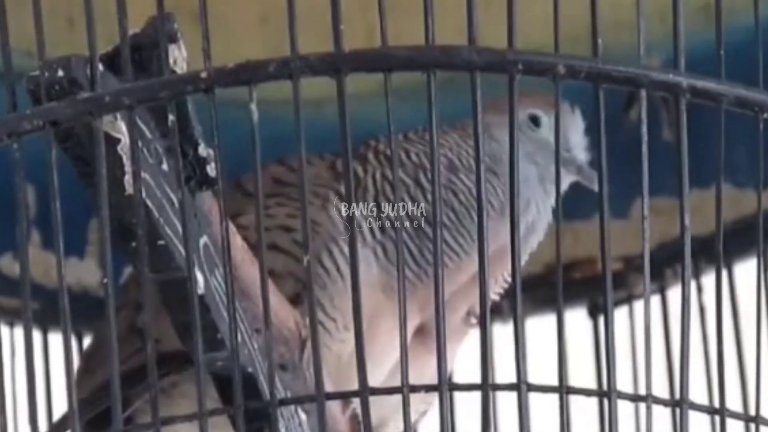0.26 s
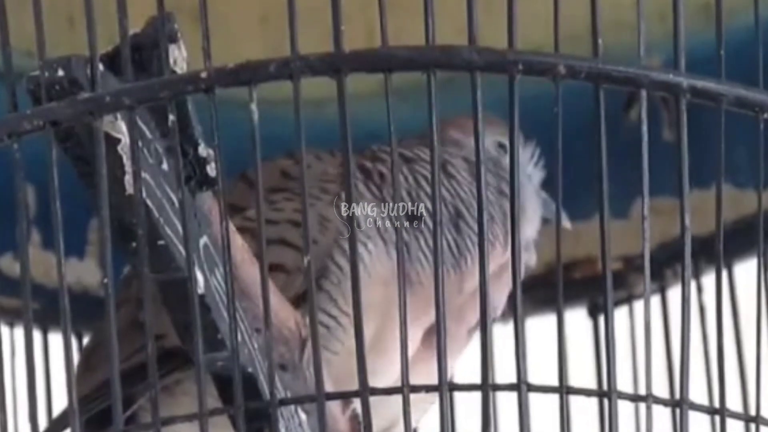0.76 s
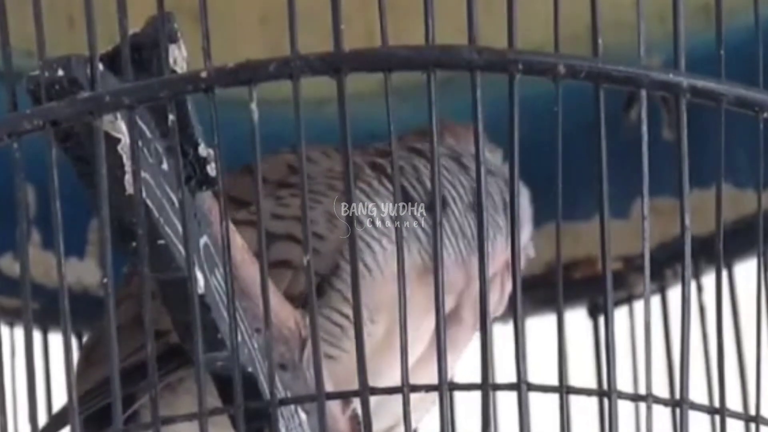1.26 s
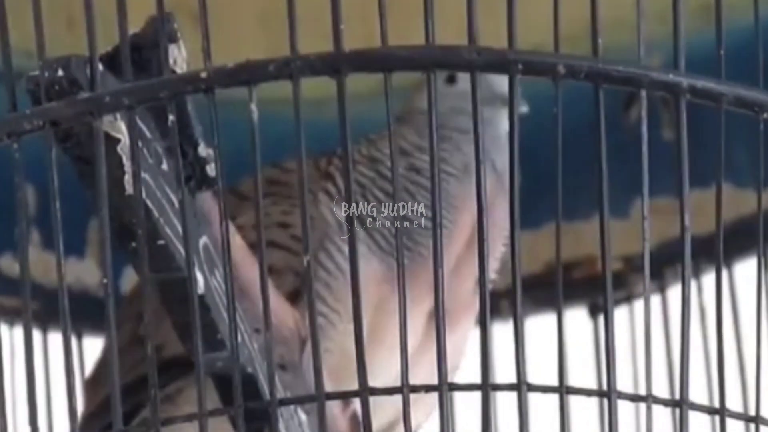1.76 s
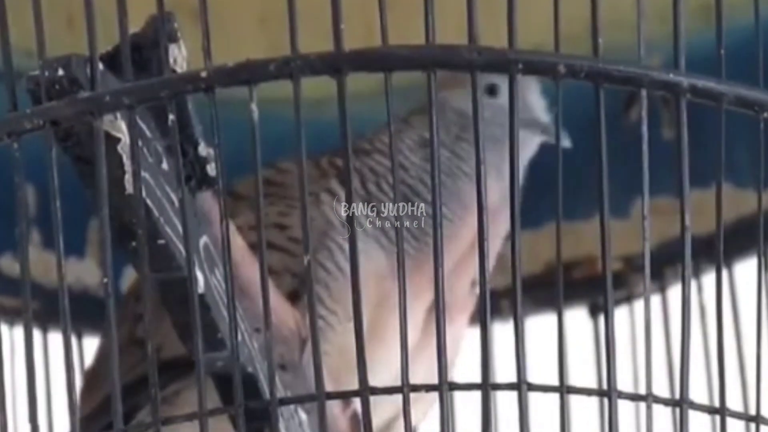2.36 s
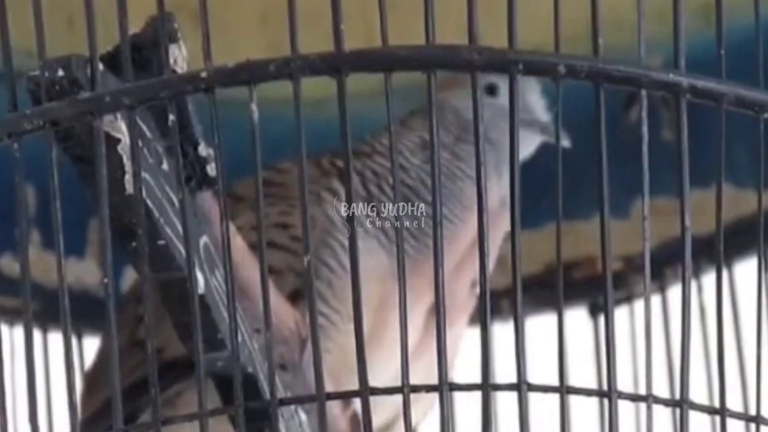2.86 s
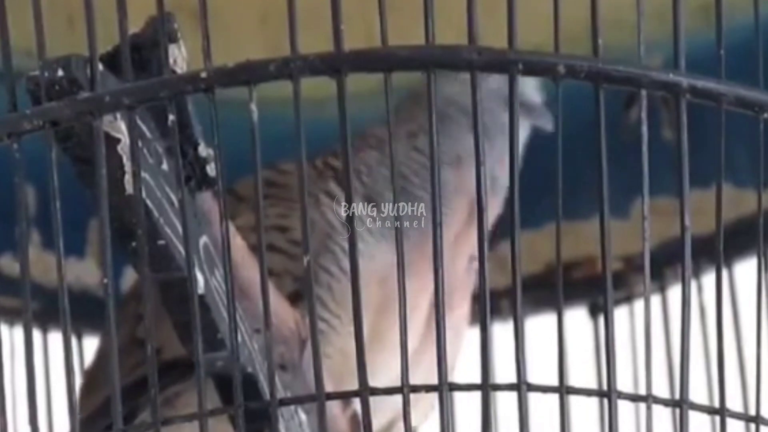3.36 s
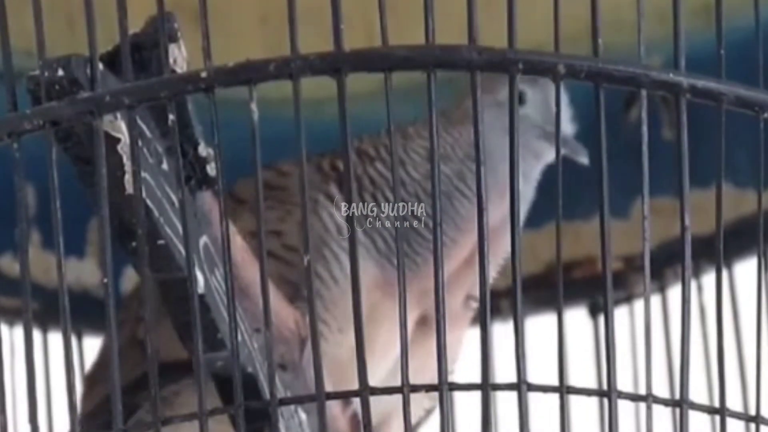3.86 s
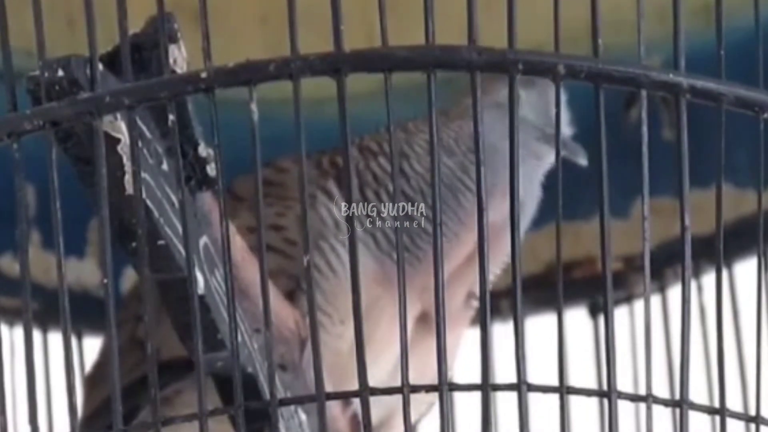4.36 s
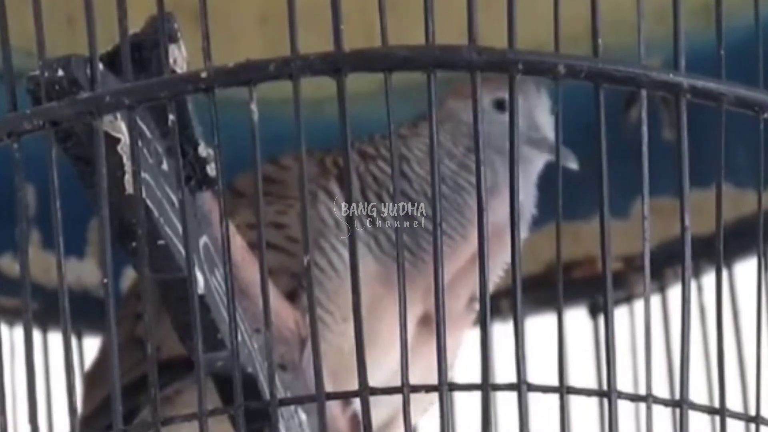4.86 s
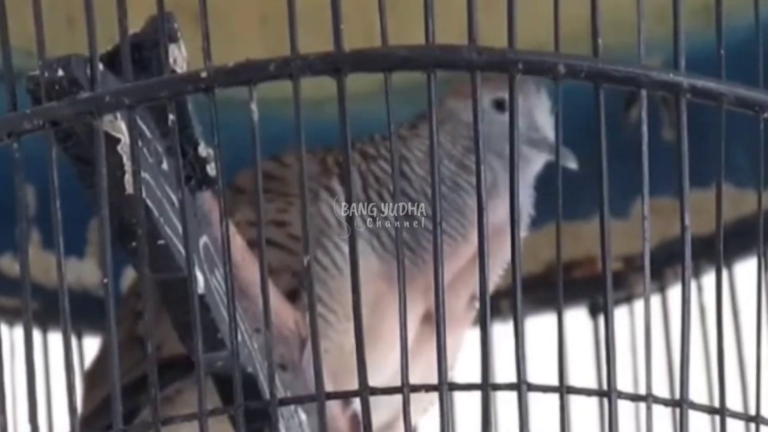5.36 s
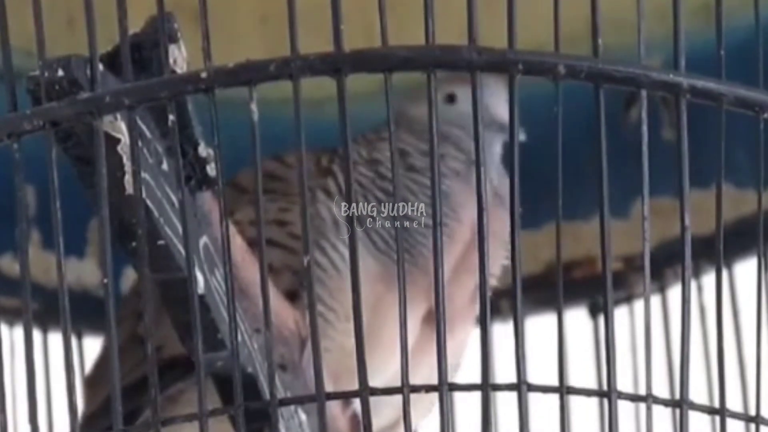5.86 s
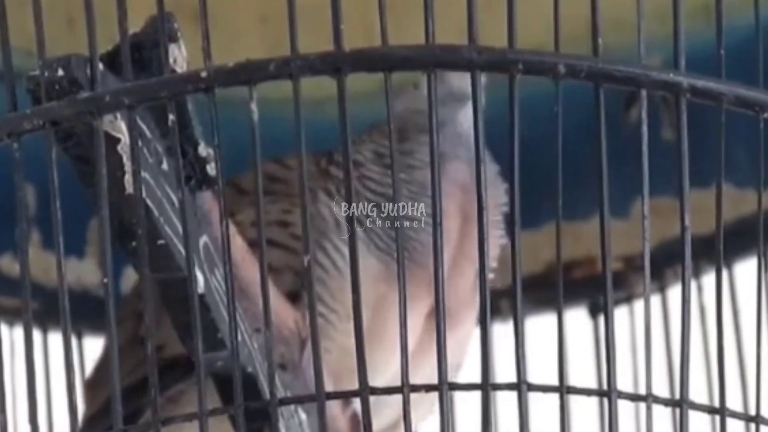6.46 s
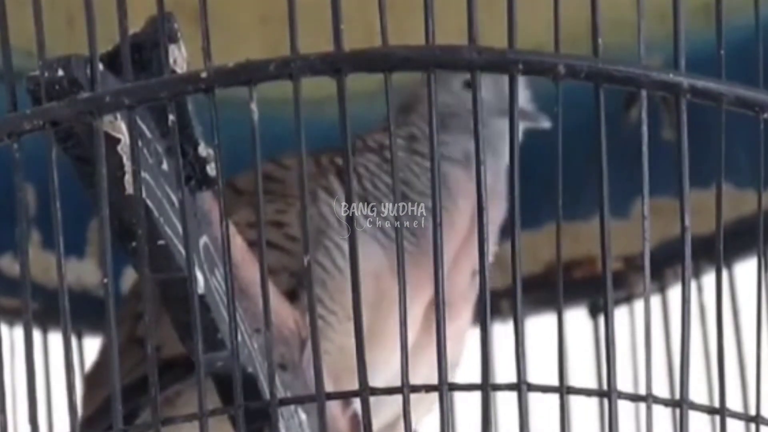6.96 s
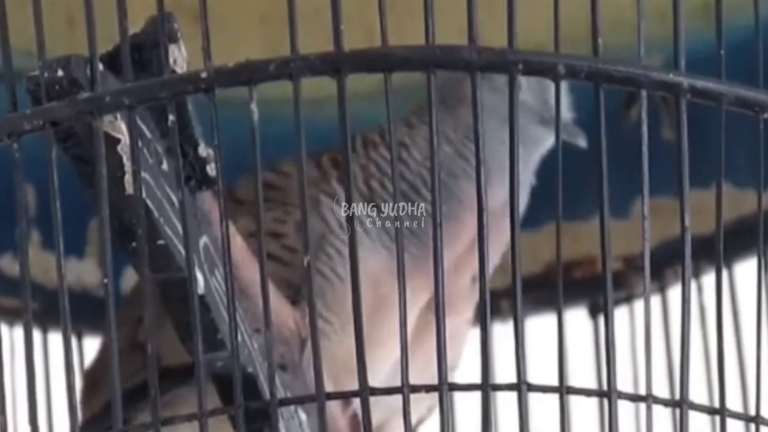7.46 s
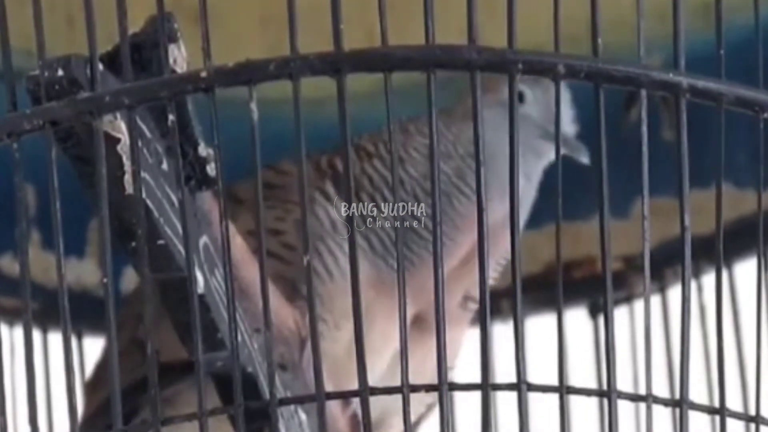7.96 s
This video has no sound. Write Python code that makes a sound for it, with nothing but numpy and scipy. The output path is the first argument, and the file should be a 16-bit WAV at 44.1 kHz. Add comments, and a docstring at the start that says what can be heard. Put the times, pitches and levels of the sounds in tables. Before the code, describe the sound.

Caged doves sing quick trills and clear coos in an echoing yard, over a faint town hum.

```python
"""A hard-walled yard with cages, on two microphones over a faint town hum.
Close by, zebra doves trill and coo in overlapping phrases; their membranes flap, then lock on a tone.
Further off a bigger dove purrs and a small bird peeps; a reedy dove calls from another cage.
Feathers rustle and a foot taps a perch. The near coos are almost pure tones:
the overloaded recorder squares them off and adds their odd overtones."""
import sys
import numpy as np
from scipy import signal
from scipy.fft import rfft, irfft, next_fast_len
from scipy.io import wavfile

SR = 44100
rng = np.random.default_rng(int(sys.argv[2]) if len(sys.argv) > 2 else 0)


def bounce(signal):
    """Save signal as a 16-bit WAV file at the path given by the first command-line argument."""
    frames = np.transpose(np.atleast_2d(signal))
    limited = np.clip(frames, -1, 1)
    pcm = np.round(limited * 32767).astype(np.int16)
    wavfile.write(sys.argv[1], SR, pcm)


N = 362061

# distant town: frequency_hz, level_db
TOWN_SPECTRUM = [(15, -76), (25, -37), (106, -12.5), (172, -9), (250, -5), (293, -7), (326, -9.5),
                 (515, -11), (1090, -11), (3090, -21.5), (4380, -24), (6040, -28), (11800, -37),
                 (15000, -65)]
# near arched coos, a firm note, two or three short, then long ones: start_s, length_s, pitch_hz, level_db
HIGH_COOS = [ (0.000, 0.052, 1021, -19), (.768, 0.14, 1200, -10.5), (.905, 0.063, 1155, -16),
             (.968, 0.043, 1120, -15), (1.052, 0.048, 1146, -12.5), (1.172, .13, 1153, -13),
             (2.310, .1, 1264, -12), (2.420, 0.062, 1206, -12), (2.490, 0.067, 1142, -13.5),
             (2.583, 0.057, 1190, -15.5), (2.677, 0.13, 1200, -14), (2.887, .157, 1178, -15),
             (3.150, 0.19, 1187, -15.5), (3.450, .195, 1188, -16), (4.355, 0.14, 1206, -14),
             (4.490, 0.056, 1173, -17), (4.568, 0.062, 1176, -16.5), (4.675, 0.1533, 1162, -16),
             (4.913, 0.16, 1145, -16.5), (6.678, 0.15, 1210, -14), (6.840, 0.056, 1154, -15),
             (6.925, .052, 1166, -15.5), (7.017, 0.15, 1156, -15), (7.257, 0.14, 1135, -15),
             (7.540, 0.058, 1125, -24), (8.175, 0.063, 1123, -27.5)]
# the quick run, seven notes that dip and climb back: offset_s, length_s, pitch_hz, level_db
RUN_NOTES = [(0, 0.0554, 1074, -11), (0.06, 0.055, 1062, -14.5), (.105, 0.05, 1041, -12),
             (.163, 0.039, 965, -13.5), (.235, .045, 945, -14), (.314, 0.043, 1012, -12.5),
             (0.415, 0.0747, 1064, -11.5)]
# each quick run: start_s
RUN_STARTS = [-0.356, 3.656, 7.569]
# near long low coos: start_s, length_s, pitch_hz, level_db
LOW_COOS = [(.133, 0.26, 958.3, -16), (.604, 0.26, 948.6, -16), (1.056, .134, 947.6, -17),
            (1.301, 0.27, 955.7, -16.5)]
# the near coos' own faint octave: multiple, level_db
NEAR_OVERTONES = [(2, -37)]
# air rushing in the throat: frequency_hz, level_db
BREATH_SPECTRUM = [(200, -19.5), (600, 0), (1400, 0.5), (2000, -5), (2900, -2.5), (3900, -4.5), (5500, -5),
                   (9000, -10.5), (15000, -22.5)]
# first echoes off the walls at each microphone: left_delay_ms, right_delay_ms, level_db
WALL_ECHOES = [(4.391, 5.672, -7), (10.735, 9.2, -11), (19.465, 21.8, -11), (33.26, 30.4, -13.5)]
# a small bird far off: start_s, length_s, pitch_hz, level_db
PEEPS = [(.460, 0.11, 5250, -73), (1.620, 0.07, 5320, -63.5), (1.750, 0.034, 2210, -58),
         (1.755, 0.064, 5350, -79.5)]
# rolled coos of the bigger dove: start_s, length_s, pitch_hz, level_db
PURRS = [(1.873, 0.21, 564, -43), (2.090, .075, 575.4, -42), (2.165, 0.097, 656, -38.5),
         (2.550, .21, 639.7, -41.5), (2.735, 0.11, 577.3, -41), (4.785, 0.075, 585.5, -38.5),
         (4.970, .11, 599, -41), (5.075, 0.15, 687, -44), (5.280, 0.256, 677.3, -42),
         (5.530, 0.2, 610, -39.5), (7.620, 0.086, 639, -43), (7.858, 0.13, 656, -41.5),
         (8.110, 0.085, 603.5, -42.5)]
# feather strokes: peak_s, width_s, level_db
RUSTLES = [(1.938, 0.016, -62), (1.99, 0.0083, -47.5), (5.553, 0.032, -59), (5.813, 0.0094, -49.5),
           (8.125, 0.02, -53.5)]
# rustling feathers: frequency_hz, level_db
FEATHER_SPECTRUM = [(300, -6.5), (1000, -5), (1800, -3), (3100, 5.5), (4200, 1.5), (5500, -10), (7500, -8),
                    (11000, -25), (15000, -44)]
# softer coos from another cage: start_s, length_s, pitch_hz, level_db
REEDY_COOS = [(5.505, 0.053, 914, -26.5), (5.528, 0.0855, 1272, -24), (5.683, 0.053, 1200, -28.5),
              (5.745, 0.029, 1183, -28.5), (5.855, 0.062, 1198, -28), (6.007, 0.135, 1188, -26.5),
              (7.928, 0.054, 1211, -27), (8.105, 0.028, 1247, -33)]
# overtones of that reedy voice: multiple, level_db
REEDY_OVERTONES = [(2, -29), (3, -28.5), (4, -38), (5, -44), (6, -30.5)]
# a foot on the perch: start_s, level_db
TAPS = [(6.615, -46.5)]
# ringing modes of the perch: pitch_hz, level_db, t60_s
PERCH_MODES = [(1019, 4.5, 0.15), (955, -9, .06), (1330, -7, 0.05), (2900, -24, .02)]


def from_db(db):
    """Decibels to gain."""
    return 10 ** (np.asarray(db) / 20)


def unit_power(x):
    """Scale to an RMS of one."""
    return x / np.sqrt(np.mean(x ** 2) + 1e-20)


def add(track, start_s, sound):
    """Mix a sound into a track from start_s on."""
    at = max(0, round(start_s * SR))
    track[at:at + len(sound)] += sound[:max(0, N - at)]


def drift(rate_hz, size):
    """A smooth random wander with a spread of about one."""
    lowpass = signal.butter(2, rate_hz, fs=SR, output="sos")
    return unit_power(signal.sosfilt(lowpass, rng.standard_normal(size + SR // 4)))[-size:]


def noise(spectrum, size):
    """Two unrelated channels of noise with a given colour."""
    hz, db = np.transpose(spectrum)
    padded = next_fast_len(size)
    bins_hz = np.maximum(np.fft.rfftfreq(padded, 1 / SR), 1)
    gain = from_db(np.interp(np.log(bins_hz), np.log(hz), db))
    white = rng.standard_normal((2, padded))
    return unit_power(irfft(rfft(white) * gain, padded)[:, :size])


def mic_pair(channels, correlation):
    """Blend two unrelated channels so the microphones share a part."""
    mid = np.sqrt(1 + correlation) * channels[0]
    side = np.sqrt(1 - correlation) * channels[1]
    return np.array([mid + side, mid - side]) / np.sqrt(2)


def town_hum():
    """The distant town: steady low noise, almost unrelated at the two microphones."""
    return from_db(-54) * mic_pair(noise(TOWN_SPECTRUM, N), correlation=0.034)


def rising_pitch(t, top_hz, scoop, scoop_s, low_hz=np.inf, break_s=0.03, flip_s=0.003):
    """A note slides up; given a lower register, it starts there and then breaks upward to its top."""
    low_hz = min(low_hz, top_hz)
    broken = 0.5 + 0.5 * np.tanh((t - break_s) / flip_s)
    return (low_hz + (top_hz - low_hz) * broken) * (1 - scoop * np.exp(-t / scoop_s))


def rasp(tone, spent, breath_db, flap, flap_hz=110, flap_s=0.032, open_s=0.0091, close_s=0.035):
    """The membranes flap unevenly and let air rush past until they lock on; then the note clears."""
    t = np.arange(len(tone)) / SR
    flapping = 1 + flap * np.exp(-t / flap_s) * drift(flap_hz, len(t))
    leak = 1 + 8.1 * np.exp(-t / close_s) + 3.4 * spent   # extra air as the note catches and runs out
    flow = 1 - np.exp(-t / open_s)   # the air takes a moment to get moving
    breath = from_db(breath_db) * leak * flow * noise(BREATH_SPECTRUM, len(t))[0]
    return tone * flapping + breath


def sing(notes, onset, attack_s, release_s, fall_hz_per_s, sag, fade_db, waver,
         swell_db=0, breath_db=-np.inf, flap=1.0, overtones=(), roll=0, roll_hz=1):
    """A bird's voice: each note catches roughly, then sags as the air runs out; long ones fall further."""
    out = np.zeros(N)
    for start_s, length_s, top_hz, db in notes:
        t = np.arange(int((length_s + release_s) * SR)) / SR
        unsettled = np.exp(-t / (0.23 * length_s))   # pressure builds early in the note
        spent = np.minimum(t / length_s, 1) ** sag
        hz = rising_pitch(t, top_hz, **onset) - fall_hz_per_s * length_s * spent
        phase = 2 * np.pi * np.cumsum(hz * (1 + waver * drift(140, len(t)))) / SR
        tone = np.sin(phase) + sum(from_db(level) * np.sin(round(k) * phase) for k, level in overtones)
        attack = np.sin(np.pi / 2 * np.clip(t / attack_s, 0, 1)) ** 2
        release = np.clip((length_s + release_s / 2 - t) / release_s, 0, 1)
        envelope = from_db(db + fade_db * spent - swell_db * unsettled) * attack * release
        roll_phase = 2 * np.pi * roll_hz * np.cumsum(1 + 0.15 * drift(36, len(t))) / SR
        throb = 1 + roll * np.cos(roll_phase)   # in a rolled note the throat opens and shuts
        add(out, start_s, envelope * throb * rasp(tone, spent, breath_db, flap))
    return out


def undertones(notes, ratio, length_s, gain_db):
    """Brief lower notes that sound along as each note begins."""
    return [(start_s, length_s, hz * ratio, db + gain_db) for start_s, _, hz, db in notes]


def yard(sound, wet_db, t60_s=0.49, treble_t60_s=0.23, split_hz=2200, build_s=0.0058):
    """Direct sound, four wall echoes and a diffuse tail whose treble dies first, at two microphones."""
    t = np.arange(SR) / SR
    diffuse = mic_pair(rng.standard_normal((2, SR)), correlation=0.41) * (1 - np.exp(-t / build_s))
    low = signal.sosfilt(signal.butter(2, split_hz, fs=SR, output="sos"), diffuse)
    high = signal.sosfilt(signal.butter(2, split_hz, "high", fs=SR, output="sos"), diffuse)
    tail = low * from_db(-60 * t / t60_s) - high * from_db(-60 * t / treble_t60_s)
    response = from_db(wet_db) * unit_power(tail) / np.sqrt(SR)
    response[:, 0] += 1   # the direct path
    for left_ms, right_ms, db in WALL_ECHOES:
        delay_s = np.array([[left_ms], [right_ms]]) / 1000
        response += from_db(db) * np.sinc(SR * (t - delay_s))
    return signal.fftconvolve(sound[None], response, axes=1)[:, :N]


def near_doves():
    """Zebra doves by the microphones: arched coos, quick runs, and low coos that open on a grace note."""
    high = sing(HIGH_COOS, dict(scoop=0.24, scoop_s=0.016, low_hz=1151, break_s=0.0459, flip_s=0.0056),
                attack_s=0.01, release_s=0.0094, fall_hz_per_s=895, sag=3.737, fade_db=-4,
                waver=0.00086, swell_db=6, breath_db=-41.5, flap=1.09, overtones=NEAR_OVERTONES)
    trills = [(start_s + offset_s, length_s, hz, db) for start_s in RUN_STARTS
              for offset_s, length_s, hz, db in RUN_NOTES if start_s + offset_s > 0]
    runs = sing(trills, dict(scoop=0.2, scoop_s=0.01175, low_hz=961.8, break_s=0.027, flip_s=0.0016),
                attack_s=0.017, release_s=0.0086, fall_hz_per_s=1060, sag=3.96, fade_db=-4.5,
                waver=0.0075, swell_db=1, breath_db=-43, flap=0.58, overtones=NEAR_OVERTONES)
    low = sing(LOW_COOS, dict(scoop=0.045, scoop_s=0.0098, low_hz=758, break_s=0.026, flip_s=0.0043),
               attack_s=0.023, release_s=0.015, fall_hz_per_s=540, sag=2.7, fade_db=-3.5,
               waver=0.0026, swell_db=6.5, breath_db=-40.5, flap=0.26, overtones=NEAR_OVERTONES)
    grace_notes = undertones(LOW_COOS, ratio=0.79, length_s=0.078, gain_db=-9)
    grace = sing(grace_notes, dict(scoop=0.038, scoop_s=0.0095),
                 attack_s=0.044, release_s=0.02, fall_hz_per_s=73, sag=3.9, fade_db=-8, waver=0.013)
    return high + runs + low + grace


def small_bird():
    """Thin, falling peeps from far off."""
    return sing(PEEPS, dict(scoop=0.023, scoop_s=0.012),
                attack_s=0.009, release_s=0.015, fall_hz_per_s=1400, sag=2.9, fade_db=-12, waver=0.024)


def big_dove():
    """Low coos from further off, rolled into a purr by the throbbing throat."""
    return sing(PURRS, dict(scoop=0.081, scoop_s=0.022), attack_s=0.0097, release_s=0.033,
                fall_hz_per_s=295, sag=2.77, fade_db=-3, waver=0.012, roll=1.1, roll_hz=75.25)


def feathers(flicker_db=4.3, flicker_hz=120):
    """Feathers rustle in short, uneven swells of bright noise."""
    t = np.arange(N) / SR
    strokes = sum(from_db(db) * np.exp(-0.5 * ((t - peak_s) / width_s) ** 2)
                  for peak_s, width_s, db in RUSTLES)
    return strokes * noise(FEATHER_SPECTRUM, N)[0] * from_db(flicker_db * drift(flicker_hz, N))


def reedy_dove():
    """A softer singer in another cage, rich in overtones, starts each coo on two tones at once."""
    upper = sing(REEDY_COOS, dict(scoop=0.123, scoop_s=0.00905, low_hz=1161, break_s=0.033, flip_s=0.0045),
                 attack_s=0.006, release_s=0.011, fall_hz_per_s=680, sag=4.16, fade_db=-1.5,
                 waver=0.012, breath_db=-42.5, flap=0.66, overtones=REEDY_OVERTONES)
    lower_notes = undertones(REEDY_COOS, ratio=0.67, length_s=0.047, gain_db=-8.5)
    lower = sing(lower_notes, dict(scoop=0.065, scoop_s=0.011),
                 attack_s=0.0047, release_s=0.014, fall_hz_per_s=370, sag=3.1, fade_db=2,
                 waver=0.033, breath_db=-36, overtones=REEDY_OVERTONES)
    return upper + lower


def perch_tap():
    """A foot strikes the perch, whose modes ring briefly."""
    out = np.zeros(N)
    t = np.arange(SR // 4) / SR
    for start_s, tap_db in TAPS:
        for hz, mode_db, t60_s in PERCH_MODES:
            add(out, start_s, from_db(tap_db + mode_db - 60 * t / t60_s) * np.sin(2 * np.pi * hz * t))
    return out


def scene():
    """The yard from the microphones: near birds mostly direct, far ones mostly reverberant."""
    near = yard(near_doves(), wet_db=-5.5)
    other_cage = yard(reedy_dove(), wet_db=-8)
    further_off = yard(big_dove(), wet_db=3)
    small_sounds = yard(small_bird() + feathers() + perch_tap(), wet_db=6)
    return near + other_cage + further_off + small_sounds + town_hum()


def flutter(rate_hz=40.05, attack_s=0.00006, recover_s=0.00068):
    """The level dips for about a millisecond some forty times a second: faint ticks on loud notes."""
    t = np.arange(SR // 200) / SR
    dip = np.minimum(t / attack_s, 1) * np.exp(-np.maximum(t - attack_s, 0) / recover_s)
    dips = np.zeros(N)
    count = int(N / SR * rate_hz)
    for k, (late, size) in enumerate(rng.random((count, 2))):
        depth = 0.42 * (0.3 + 1.53 * size)
        add(dips, (k + 0.68 + 0.0984 * late) / rate_hz, depth * dip)
    return 1 - np.clip(dips, 0, 1)


def record(dry, ceiling=0.1, knee=0.87, stopband_hz=15700):
    """The recorder overloads softly, squeezing each wave; the level flutters and the top treble is cut."""
    oversampled = signal.resample_poly(dry, 2, 1, axis=1)
    drive = np.abs(oversampled / ceiling) ** knee
    squeezed = ceiling * np.sign(oversampled) * (1 - np.exp(-drive)) ** (1 / knee)
    ticking = signal.resample_poly(squeezed, 1, 2, axis=1) * flutter()
    return signal.sosfilt(signal.cheby2(14, 70, stopband_hz, fs=SR, output="sos"), ticking)


dry = scene()
out = record(dry)
bounce(out)
```